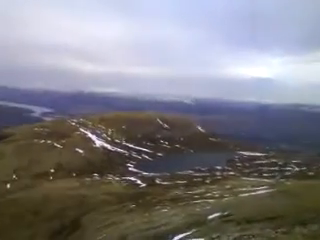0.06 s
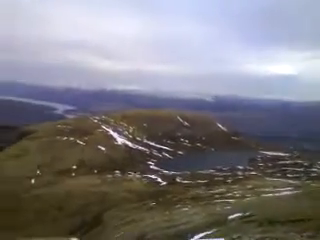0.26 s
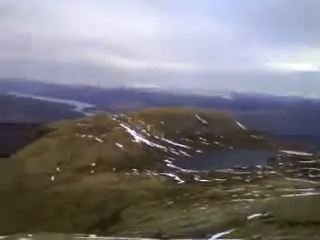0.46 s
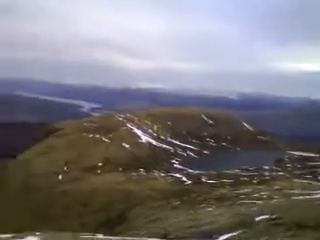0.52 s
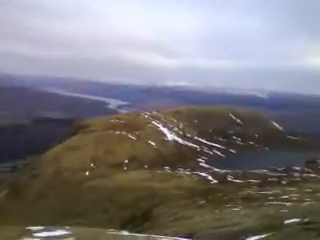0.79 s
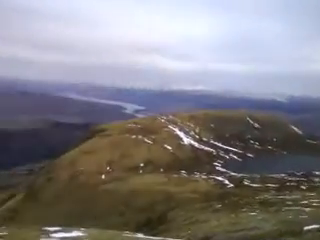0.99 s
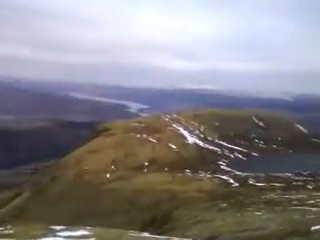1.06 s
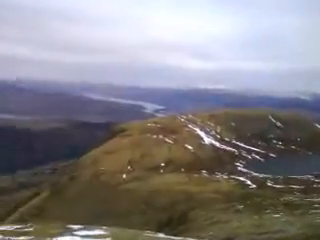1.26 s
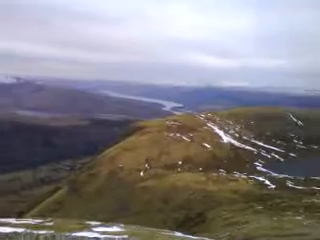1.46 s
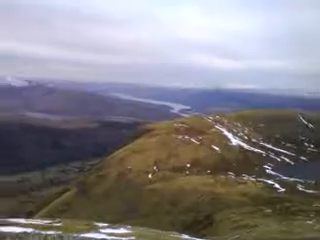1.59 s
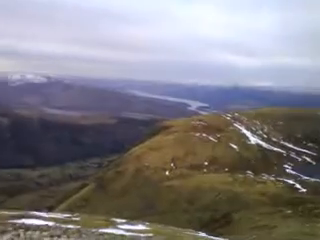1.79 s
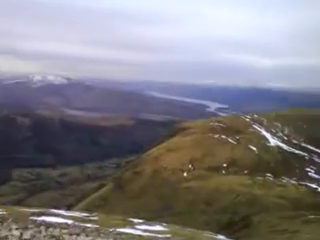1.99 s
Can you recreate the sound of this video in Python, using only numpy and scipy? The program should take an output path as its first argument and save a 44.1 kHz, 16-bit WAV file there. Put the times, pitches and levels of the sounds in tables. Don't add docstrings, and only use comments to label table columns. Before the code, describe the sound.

Strong wind on an open hillside pushes directly on a small camera microphone: a moderate rumble, a burst near half a second, a brief lull, then rougher thumping gusts with ragged snaps through to the end.

```python
import sys
import numpy as np
from scipy import signal
from scipy.fft import rfft, irfft
from scipy.io import wavfile
from scipy.ndimage import uniform_filter1d

SR = 44100
rng = np.random.default_rng(int(sys.argv[2]) if len(sys.argv) > 2 else 0)


def boost_factor(decibels):
    exponent = np.asarray(decibels, float) / 20
    return 10 ** exponent


def persist_wave(psi):
    counts = np.round(np.clip(psi, -1, 1) * 32767).astype(np.int16)
    wavfile.write(sys.argv[1], SR, np.atleast_2d(counts).T)


N = 89390

# (time [s], pressure level [dB], air speed [share of twice the mean])
GUSTS = [(0.0, -20.5, 0.42), (0.04, -22, 0.55), (0.06, -26.5, 0.7), (0.35, -22.5, 0.53),
         (0.47, -12.5, 0.46), (0.54, -29, 0.78), (0.66, -41.5, 1), (0.71, -22.5, 0.53), (0.77, -18.5, 0.69),
         (0.98, -16, 0.5), (1.12, -30, 0.66), (1.29, -18, 0.61), (1.3, -23, 0.6), (1.71, -15, 0.54),
         (1.75, -23, 0.75), (1.83, -15.5, 0.55), (1.97, -21.5, 0.54), (2.02, -16, 0.67)]
MEAN_DB = -19


def walk(rate):
    hold = max(int(SR / rate), 2)
    levels = rng.standard_normal(N // 20 + 1)[:N // hold + 1]
    steps = np.repeat(levels, hold)
    smooth = uniform_filter1d(uniform_filter1d(steps, hold), hold)
    return 1.614 * smooth[:N]


def shape(table, hz):
    table = np.array(table)
    return np.interp(np.log(hz), np.log(table[:, 0]), table[:, 1])


def coloured(table):
    hz = np.maximum(np.fft.rfftfreq(N, 1 / SR), 1)
    white = rfft(rng.standard_normal(N))
    noise = irfft(white * boost_factor(shape(table, hz)), N)
    return noise / np.std(noise)


def far_wash(gust_db):
    # (frequency [Hz], level [dB per Hz])
    wash_colour = [(350, -19), (700, -0.5), (2200, -5), (4000, -12.5), (6500, -22), (9000, -42)]
    level_db = -55 + 0.45 * (gust_db - MEAN_DB) + 1.5 * walk(7.7)
    return coloured(wash_colour) * boost_factor(level_db)


def casing_hiss(t):
    # (frequency [Hz], level [dB per Hz])
    hiss_colour = [(500, -32), (1100, -3.5), (2000, 8.5), (3200, -3), (4600, 1), (5400, -1.5), (6150, 4),
                   (6900, -8)]
    peak_s, hold_s, gone_s = 0.065, 0.049, 0.42
    swell_db = np.interp(t, [0, peak_s], [-0.5, 0])
    fall_db = 163 * np.maximum(t - peak_s - hold_s, 0)
    rest = boost_factor(-15) / (1 + np.exp((t - gone_s) / 0.0096))
    level = boost_factor(-38 + 0.6 * walk(30)) * (boost_factor(swell_db - fall_db) + rest)
    hiss = coloured(hiss_colour) * level
    return signal.sosfilt(signal.ellip(8, 0.2, 60, 6750, fs=SR, output="sos"), hiss)


def snaps():
    # (time [s], peak level [dB])
    snap_list = [(0.1198, -33), (0.4619, -27), (0.4812, -25), (0.7636, -24), (0.8053, -17), (0.8249, -16.5),
                 (0.8776, -17.5), (0.8869, -17), (0.9054, -16), (0.9348, -22), (0.9814, -24), (0.9991, -30),
                 (1.0724, -50), (1.4937, -32), (1.5598, -22.5), (1.5877, -19), (1.6105, -23),
                 (1.7143, -23.5), (1.732, -27), (1.8096, -24.5), (1.8293, -22.5), (1.8517, -20.5)]
    tail_s, boost_db = 0.0019, 8.5
    kicks = np.zeros(N)
    tail = np.arange(600) / SR
    swell = tail / tail_s * np.exp(-2 * tail / tail_s)
    ragged = rng.standard_normal((len(snap_list), 600))
    for (at, db), noise in zip(snap_list, ragged):
        i = int(at * SR)
        kicks[i:i + len(tail)] += boost_factor(db + boost_db) * noise * swell
    return 12 * signal.sosfilt(signal.butter(3, 1430, fs=SR, output="sos"), kicks)


def puffs(t, gust_db):
    # (time [s], peak level [dB], length [s])
    puff_list = [(0.002, -27, 0.01), (0.113, -30, 0.017), (0.287, -20, 0.036), (0.397, -25.5, 0.03),
                 (0.463, -18.5, 0.033), (0.483, -14.5, 0.034), (0.524, -15.5, 0.015), (0.702, -26, 0.013),
                 (0.762, -21.5, 0.032), (0.798, -16, 0.032), (0.811, -16.5, 0.025), (0.871, -11, 0.025),
                 (0.898, -15.5, 0.029), (0.929, -12.5, 0.02), (0.986, -23.5, 0.029), (1.066, -15.5, 0.025),
                 (1.21, -24, 0.025), (1.28, -27, 0.021), (1.347, -25, 0.036), (1.439, -18.5, 0.024),
                 (1.487, -11.5, 0.028), (1.52, -14.5, 0.025), (1.551, -17.5, 0.038), (1.592, -9.5, 0.029),
                 (1.644, -18, 0.018), (1.706, -13.5, 0.025), (1.809, -21, 0.019), (1.834, -11, 0.025),
                 (1.875, -14.5, 0.035), (1.974, -19, 0.026)]
    oct_per_db, base_db, rise_share = 0.0665, -12, 0.32
    speed_up = np.zeros(N)
    for at, db, length in puff_list:
        stands_out_db = db - gust_db[int(at * SR)] - base_db
        octaves = np.clip(oct_per_db * stands_out_db, 0, 2.5)
        from_peak = (t - at - rise_share * length) / max(length, 0.002)
        from_peak = np.where(from_peak < 0, from_peak / rise_share, from_peak)
        speed_up = np.maximum(speed_up, octaves * np.exp(-from_peak ** 2))
    return speed_up


def lumpy_air():
    lumps = boost_factor(4 * walk(350))
    usual_lump = np.sqrt(uniform_filter1d(lumps ** 2, int(0.012 * SR)))
    return rfft(rng.standard_normal(N) * lumps / usual_lump)


def buffeting(t, gust_db):
    # (frequency [Hz], level [dB per Hz])
    eddy_colour = [(12, -6), (40, 2), (110, -2.5), (300, -12.5), (800, -28), (2000, -47), (5000, -64),
                   (12000, -81)]
    speed_oct_per_db, puff_db_per_oct, eddy_db = 0.0971, 1.5, 1.5
    deep_hz, deep_follows = 70, 0.37
    puff = puffs(t, gust_db)
    gust_speed = 2 * np.interp(t, *np.array(GUSTS).T[[0, 2]])
    flutter = 0.12 * walk(120)
    speed = gust_speed * 2 ** (speed_oct_per_db * (gust_db - MEAN_DB) + puff + flutter)
    air = lumpy_air()
    octave = np.log2(np.maximum(np.fft.rfftfreq(N, 1 / SR), 1))
    rumble = np.zeros(N)
    for centre in np.arange(8, 27) / 2:
        band = irfft(air * np.clip(1 - 2 * abs(octave - centre), 0, 1), N)
        follows = deep_follows + (1 - deep_follows) * min(2 ** centre / deep_hz, 1)
        push_db = follows * (gust_db - MEAN_DB + puff_db_per_oct * puff)
        colour_db = shape(eddy_colour, 2 ** centre / speed ** follows)
        shimmer_db = 0.8 * walk(18)
        rumble += band * boost_factor(colour_db + push_db + shimmer_db) / np.sqrt(speed)
    return 12 * rumble * boost_factor(eddy_db + MEAN_DB)


def scene():
    t = np.arange(N) / SR
    gust_db = np.interp(t, *np.array(GUSTS).T[:2])
    background = far_wash(gust_db) + casing_hiss(t)
    return (background + snaps() + buffeting(t, gust_db))[None]


def low_pass(x):
    return signal.sosfilt(signal.butter(12, 8060, fs=SR, output="sos"), x)


def record(dry):
    headroom, fade_s, mirror_hz = 0.89, 0.004, 8000
    x = signal.sosfilt(signal.butter(2, 15.4, "high", fs=SR, output="sos"), dry)
    x = headroom * np.tanh(x / headroom)
    x = x + boost_factor(-80) * rng.standard_normal(N)
    time_left = np.arange(N)[::-1] / SR
    x = x * np.clip(time_left / fade_s + 0.1, 0, 1)
    low = signal.sosfilt(signal.butter(3, 5560, fs=SR, output="sos"), x)
    upper = signal.sosfilt(signal.butter(1, 120, "high", fs=SR, output="sos"), low)
    mirror = boost_factor(-50) * upper * np.cos(2 * np.pi * mirror_hz * np.arange(N) / SR)
    return low_pass(low + mirror)


dry = scene()
out = record(dry)
persist_wave(out)
```